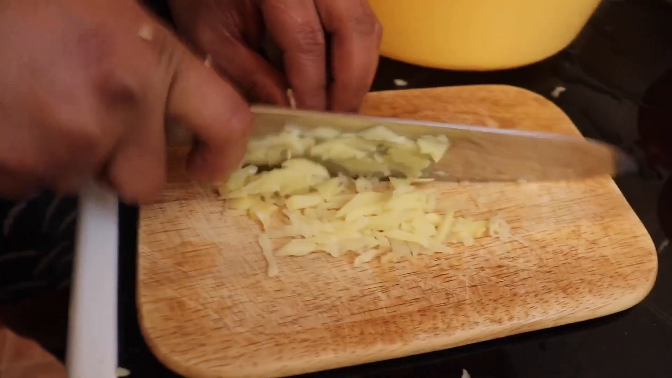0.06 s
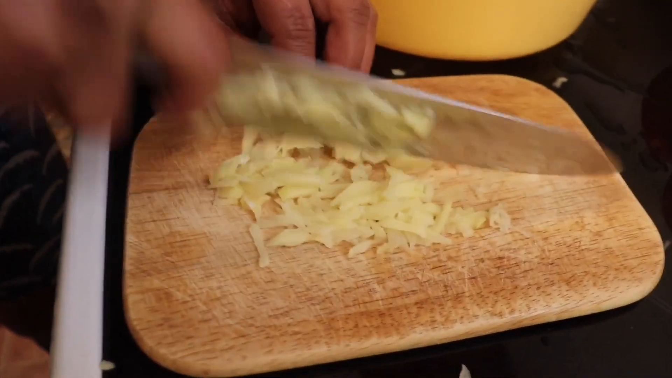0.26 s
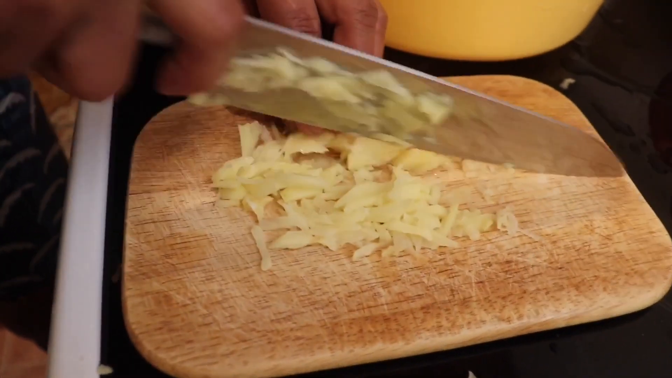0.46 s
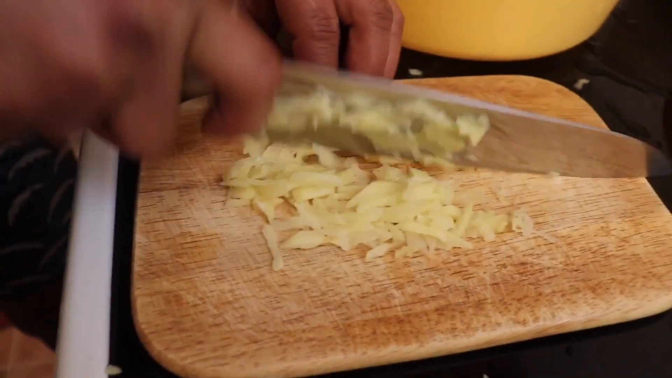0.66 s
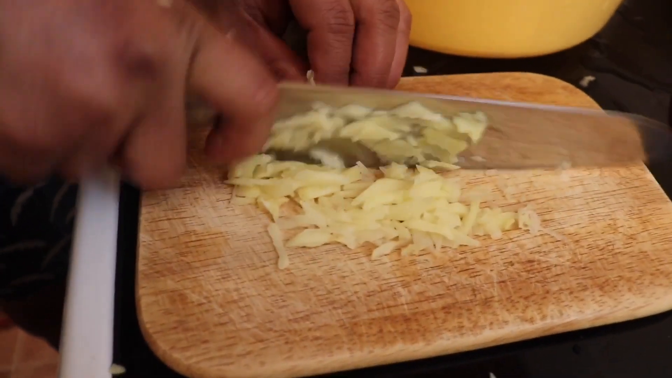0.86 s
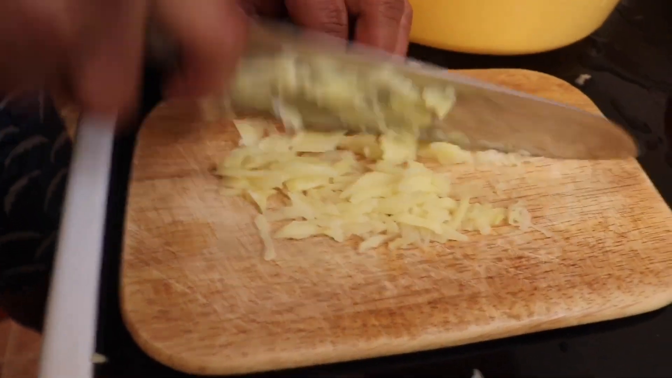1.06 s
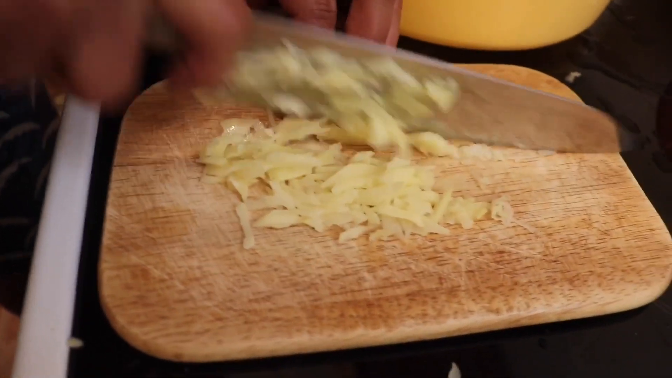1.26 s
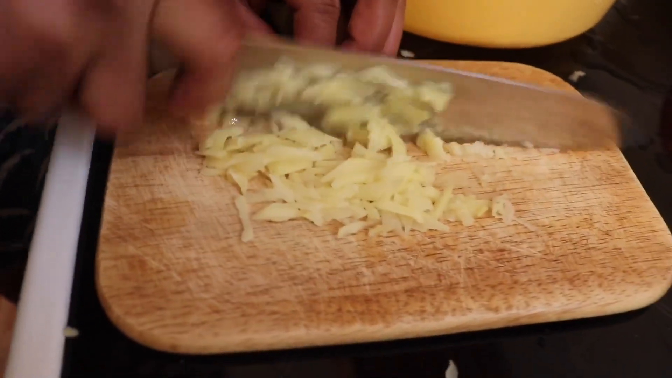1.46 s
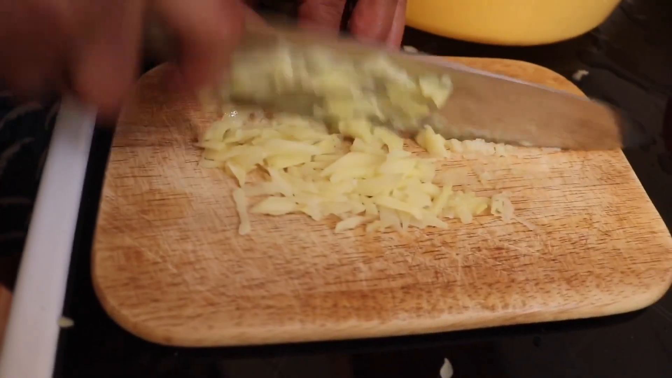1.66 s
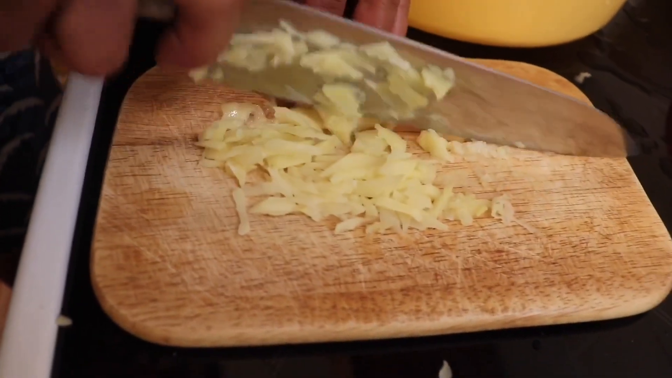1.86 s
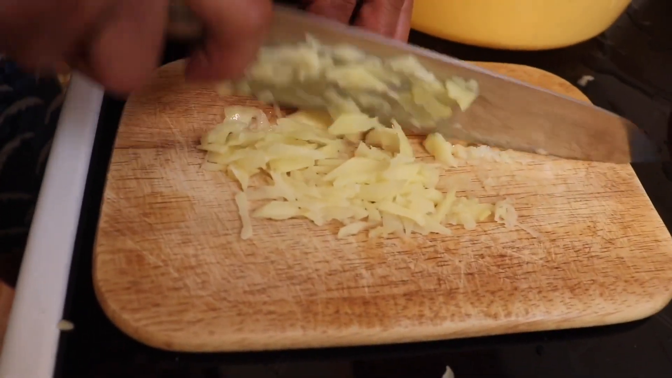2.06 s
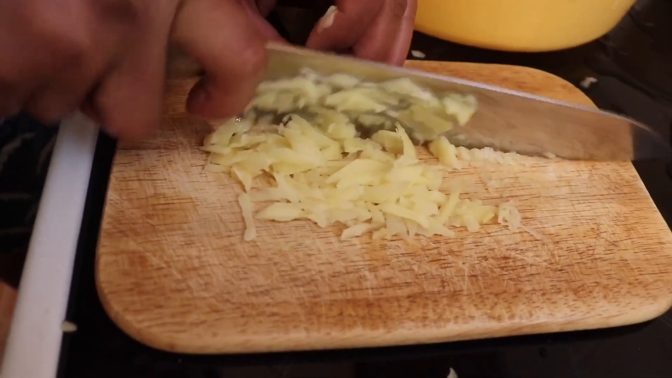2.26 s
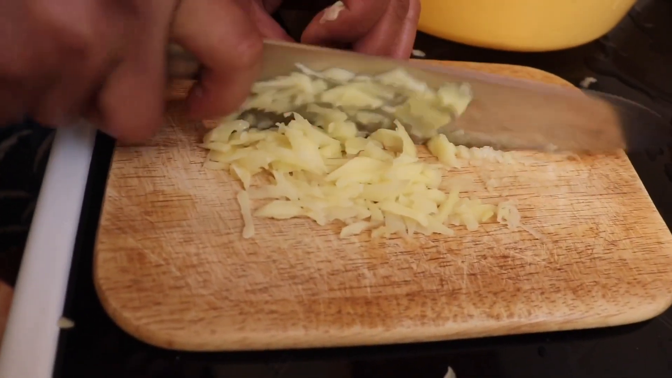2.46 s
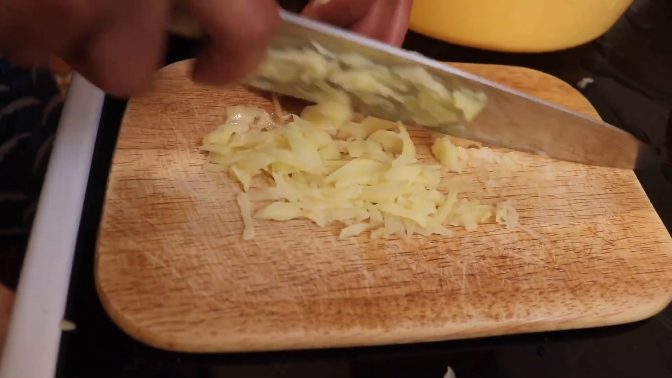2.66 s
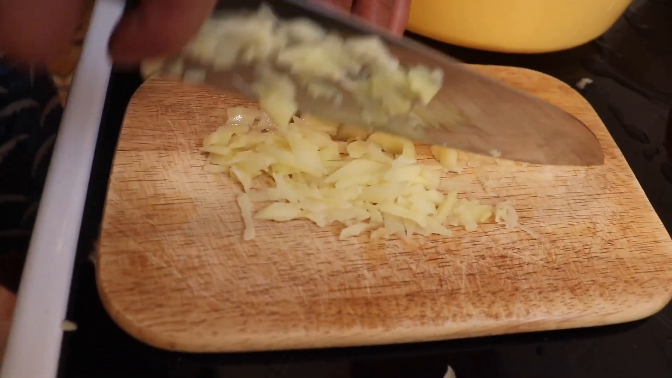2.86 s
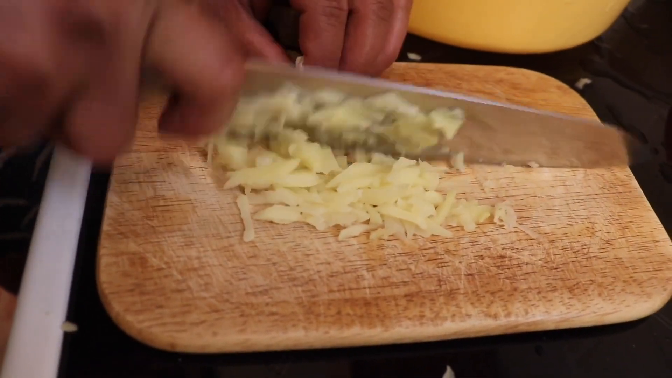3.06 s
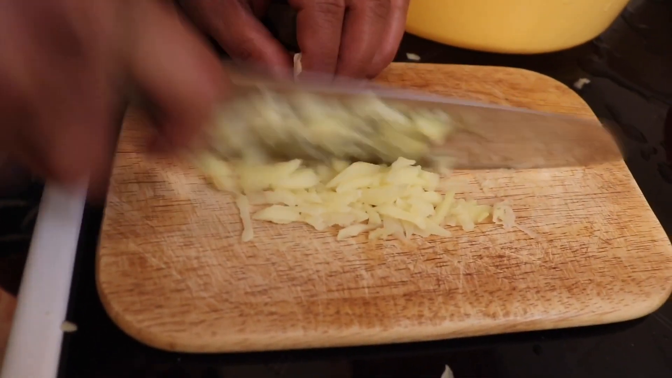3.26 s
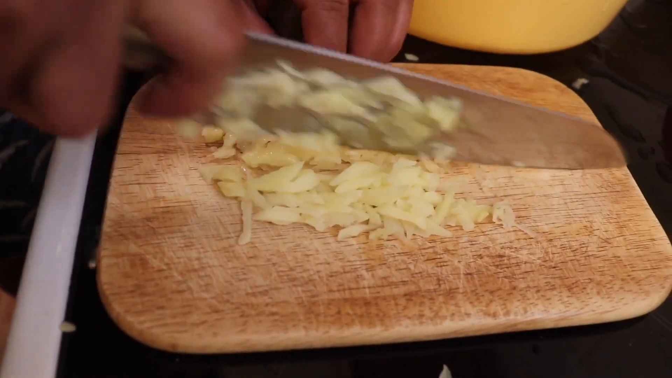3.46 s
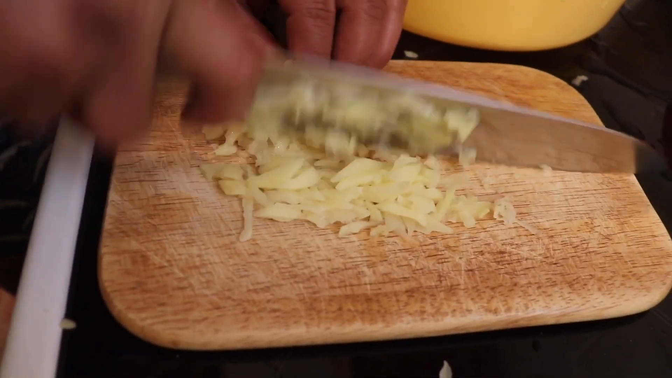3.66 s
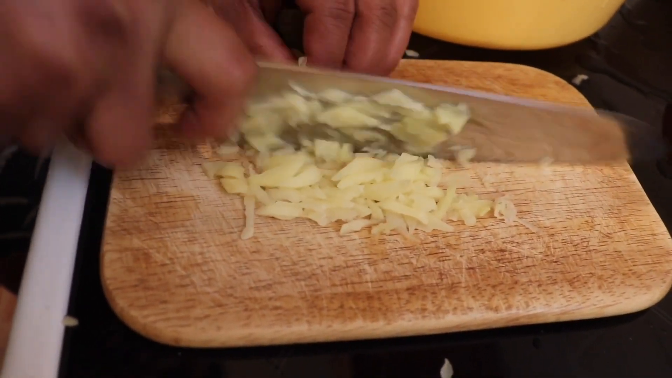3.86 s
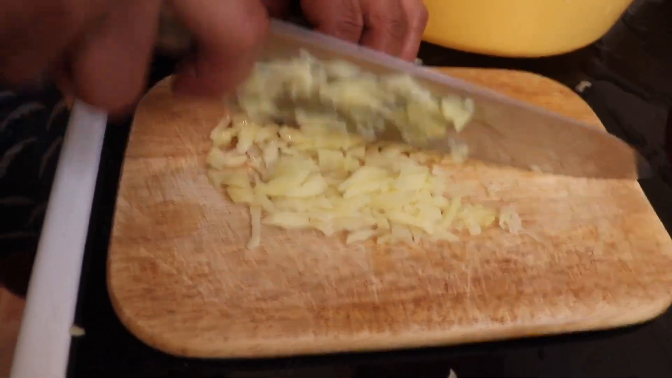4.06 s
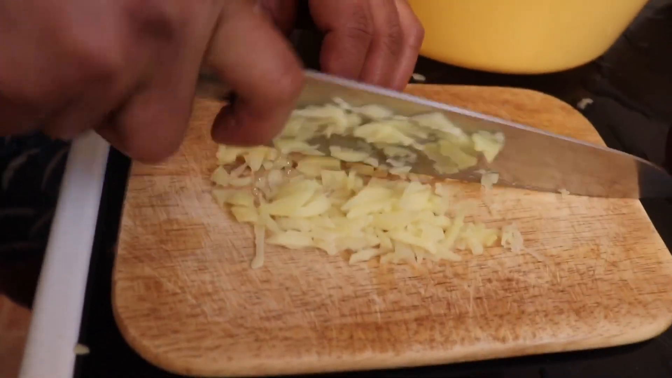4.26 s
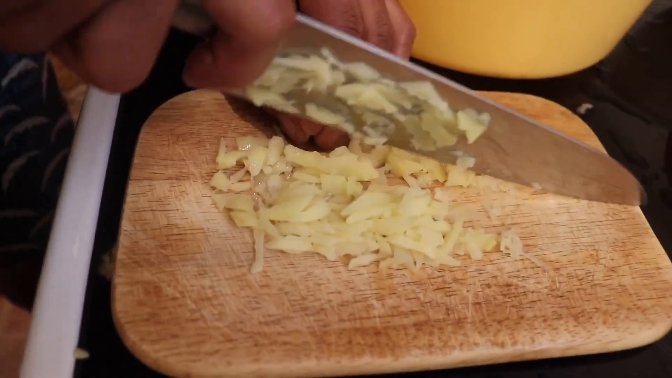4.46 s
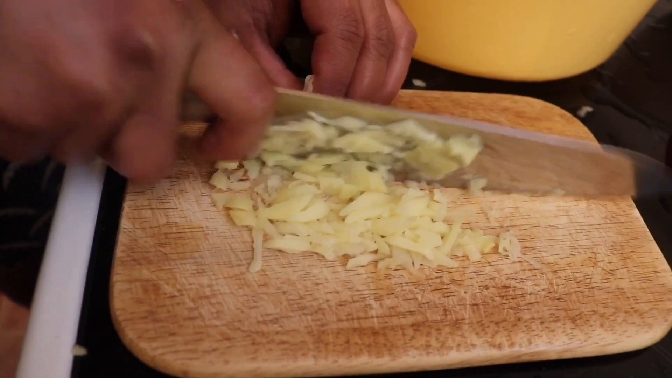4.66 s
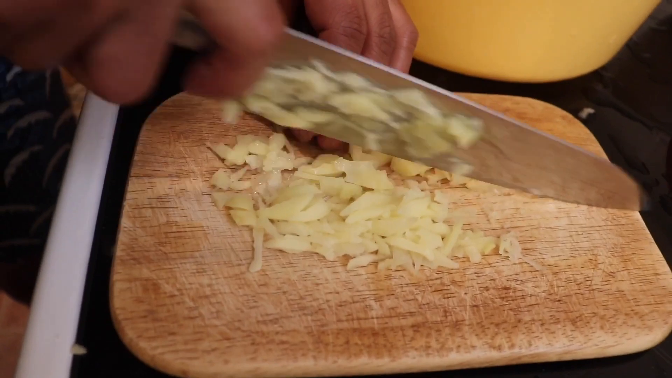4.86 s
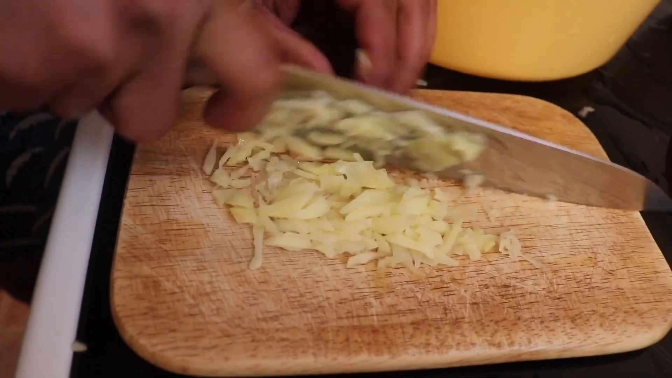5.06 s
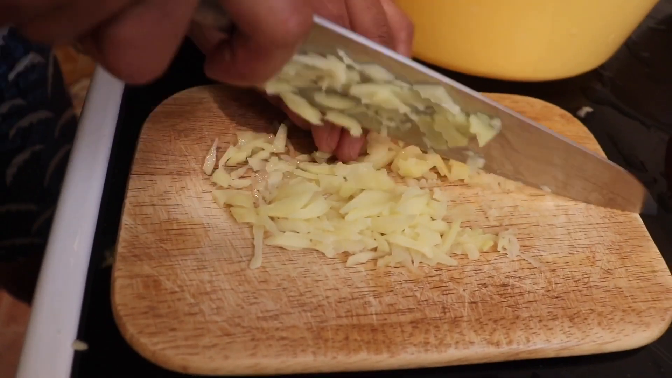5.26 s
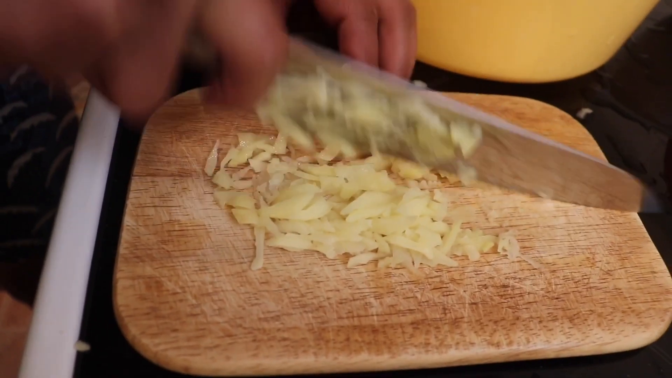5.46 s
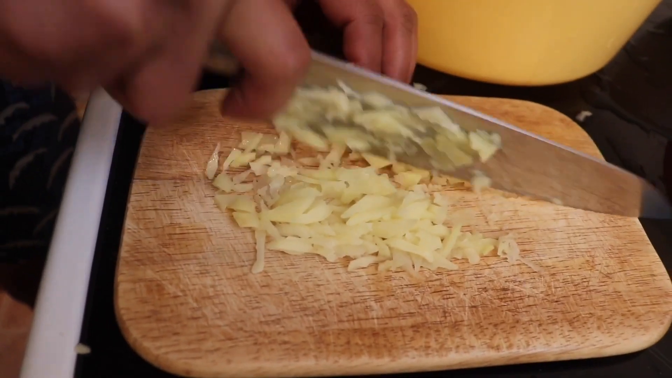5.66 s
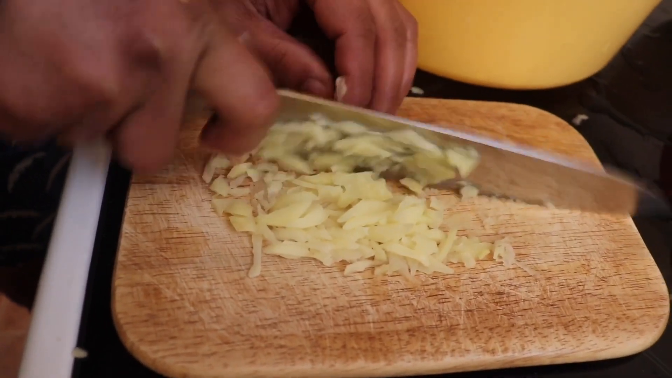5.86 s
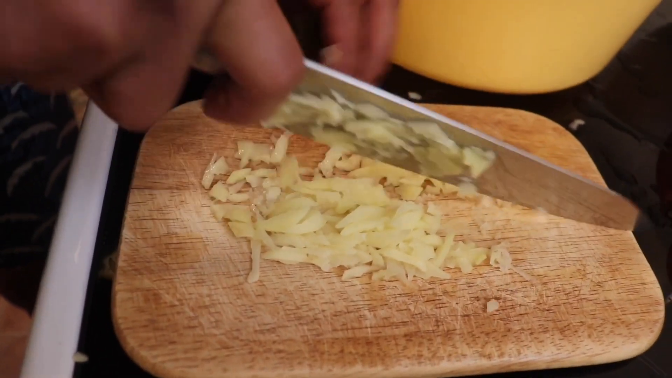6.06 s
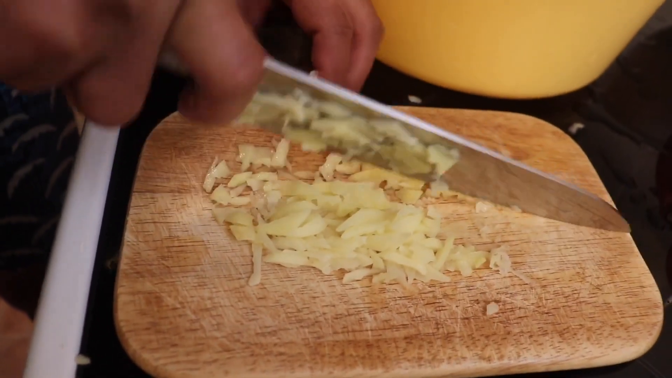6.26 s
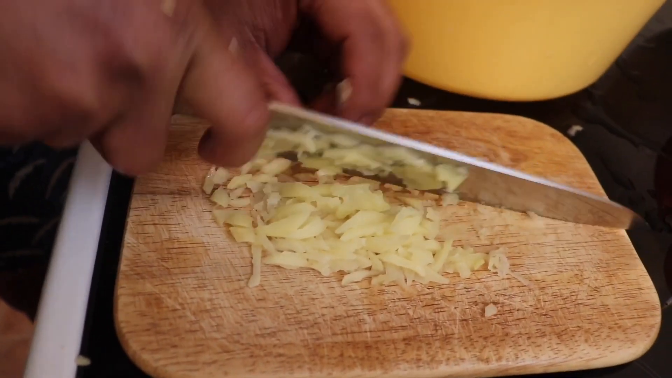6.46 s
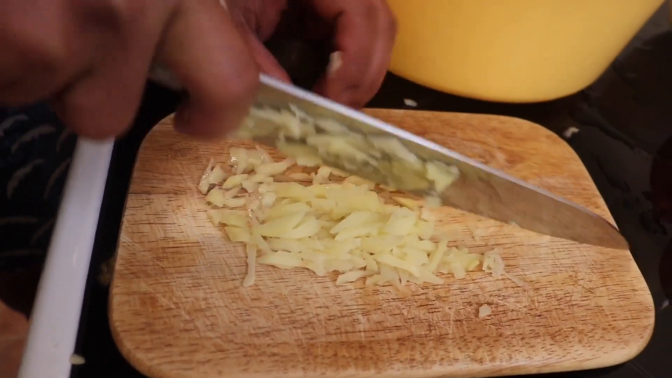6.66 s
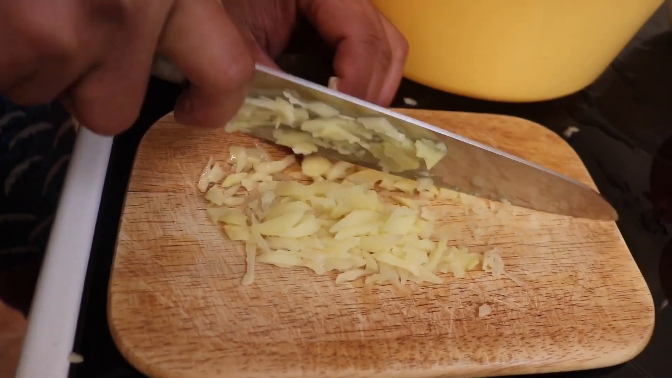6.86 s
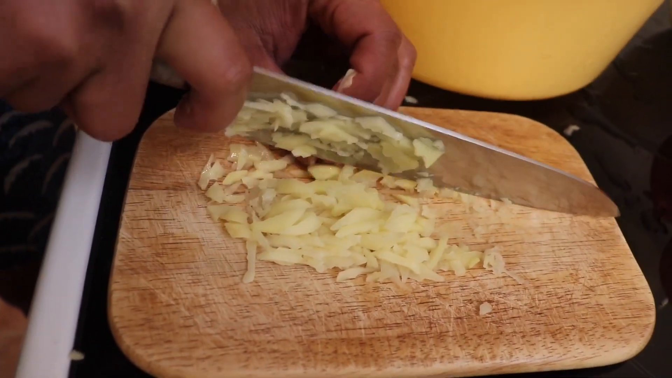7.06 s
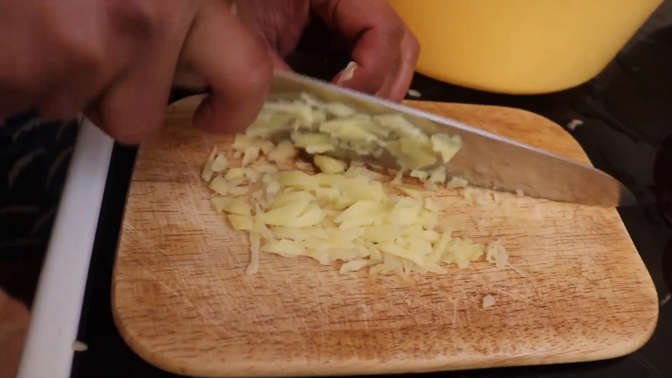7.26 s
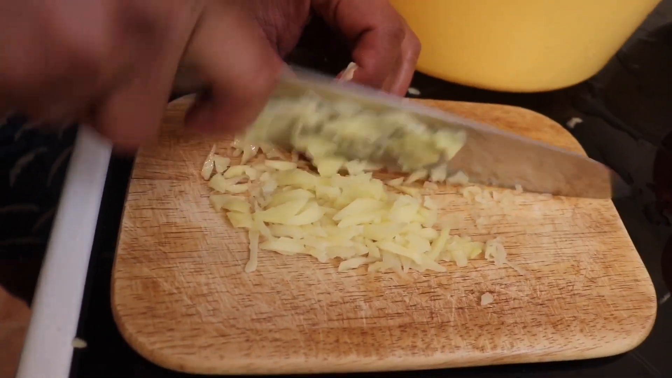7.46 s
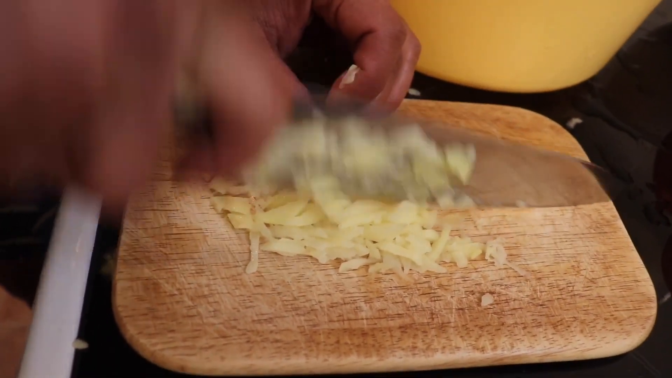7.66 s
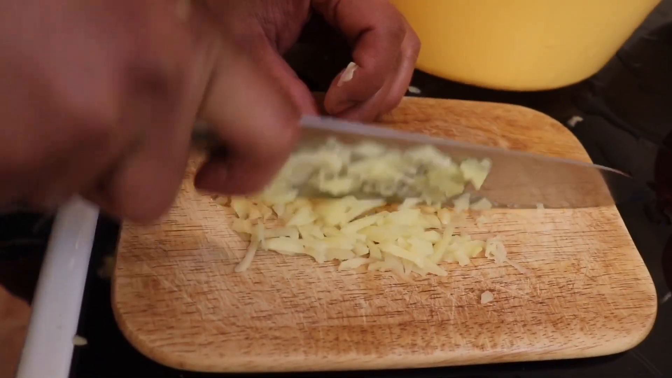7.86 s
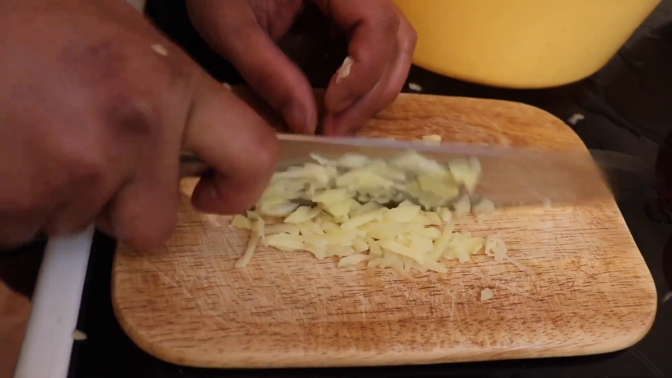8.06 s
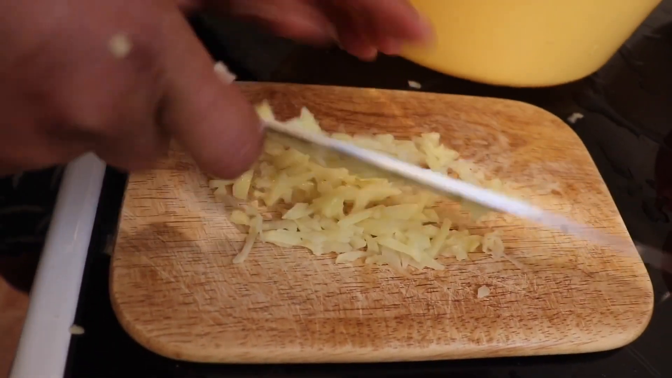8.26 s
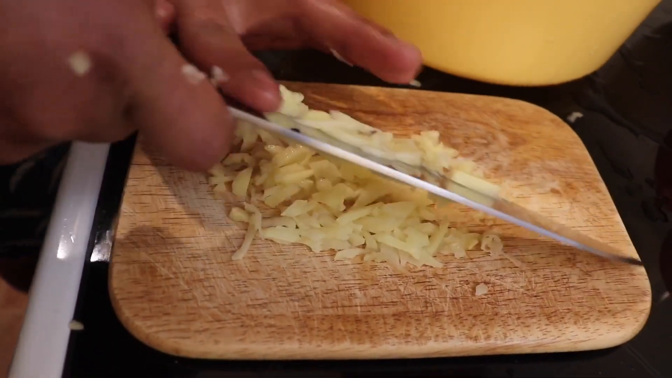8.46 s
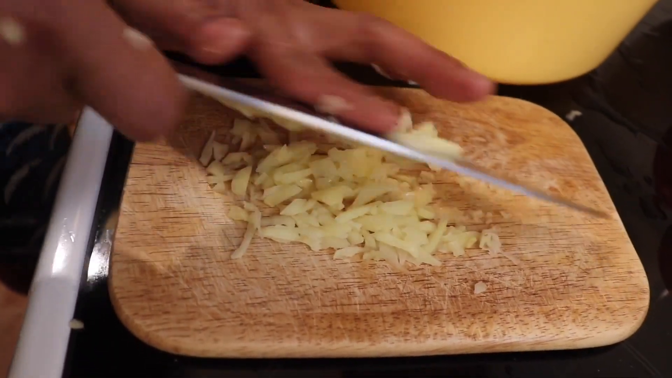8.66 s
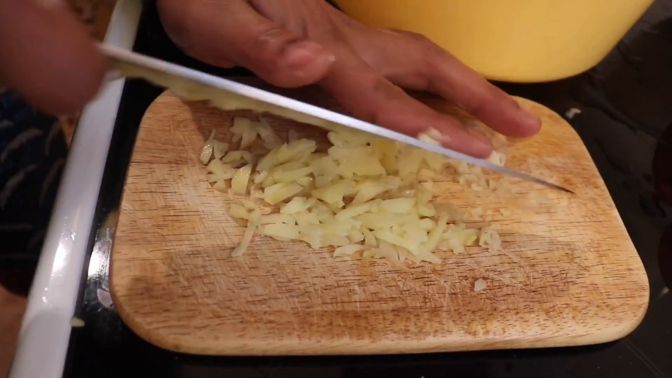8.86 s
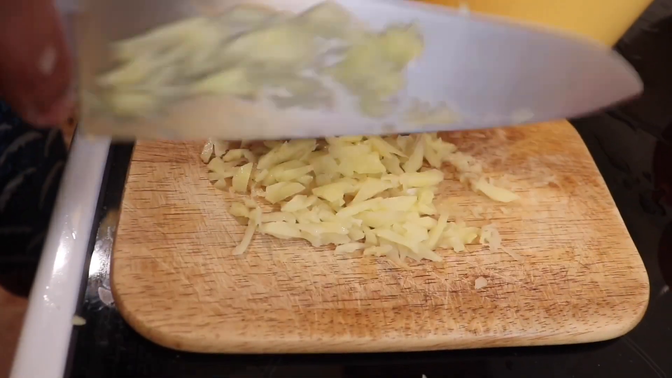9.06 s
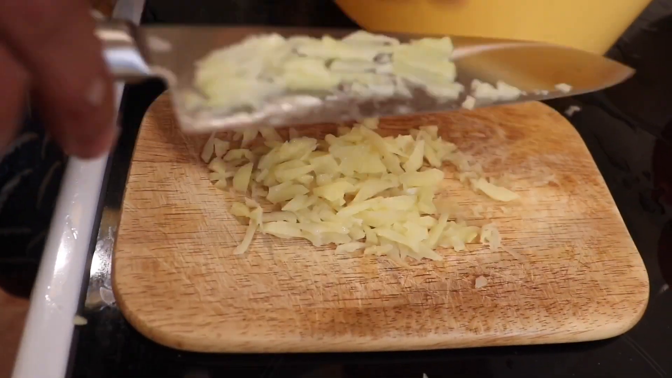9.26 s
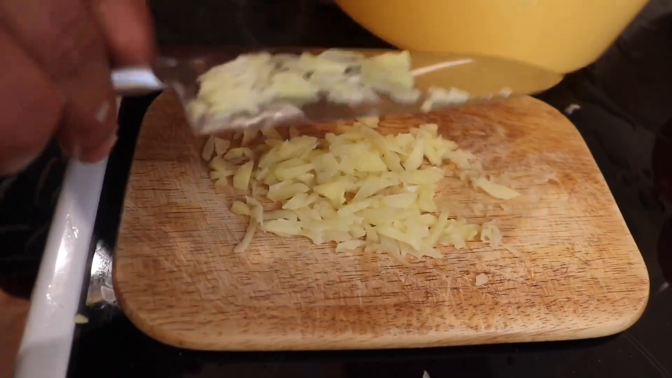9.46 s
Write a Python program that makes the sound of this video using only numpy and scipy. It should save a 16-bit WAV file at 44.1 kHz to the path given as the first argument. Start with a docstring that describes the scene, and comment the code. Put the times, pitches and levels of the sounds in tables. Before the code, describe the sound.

A knife chops wet raw potato on a wooden board in quick, fairly even crunching strokes, with a few hard knocks and faint hiss behind.

```python
"""A chef's knife shreds raw potato on a wooden board, close to the right side of a camera's two-port microphone.
Each stroke is a wet crunch of bursting cells, mostly followed by a second; the blade slides softly in between.
The board takes a few hard knocks, ringing as dying sines with a crack of noise and a short kitchen tail.
Dull bumps ring the camera shell, scraps of potato pat down, fingers wipe the blade and the table rumbles.
Behind it all lies a quiet, steady hiss of filtered noise."""
import sys
import numpy as np
from scipy import signal
from scipy.fft import rfft, irfft
from scipy.io import wavfile
from scipy.ndimage import uniform_filter1d

SR = 44100
rng = np.random.default_rng(int(sys.argv[2]) if len(sys.argv) > 2 else 0)


def log_audio(samples):
    """Write samples as a 16-bit WAV file to the path given in sys.argv[1]."""
    # one column per channel
    frames = np.atleast_2d(samples).T
    # limit to full scale, then quantise
    limited = np.clip(frames, -1, 1)
    pcm = np.round(limited * 32767).astype(np.int16)
    wavfile.write(sys.argv[1], SR, pcm)


N = 419388

# knife strokes, levels ahead of the knife's mix gains:
# (t/s, rise/s, hold/s, level/dB, bass/dB, treble/dB, slide back level/dB, second crunch)
STROKES = [(0.008, 0.012, 0.0055, -21, 0, 1.5, -51, None),
           (0.251, 0.01, 0.052, -33.5, -2.5, 0.5, -50.5, None),
           (0.543, 0.0061, 0.015, -19, -21, 0.5, -52, (0.06, .002, -43)),
           (0.805, 0.013, 0.012, -26.5, 3, -3.5, -50.5, (0.052, 0.0018, -22)),
           (0.989, .015, 0.011, -21, 22, -9, -64, None),
           (1.071, .013, 0.024, -17, -7, -2, -50.5, (.086, 0.011, -30.5)),
           (1.35, 0.0056, 0.053, -27, -2, -7, -48, None),
           (1.388, 0.012, 0.012, -23.5, -0.5, 0, -48.5, (0.049, 0.031, -25)),
           (1.649, .009, 0.029, -23, -7, -1.5, -50, (0.086, 0.0044, -26)),
           (1.925, 0.019, .013, -28.5, 1.5, -0.5, -53, (0.076, .002, -39)),
           (2.165, 0.0039, 0.024, -23, -0.5, .5, -48.5, (0.068, .002, -44)),
           (2.43, 0.0041, 0.009, -23.5, 16, 0, -49.5, None),
           (2.959, 0.0081, 0.015, -18, -7.5, 0, -47, (.072, 0.0022, -28)),
           (3.258, 0.012, 0.021, -24.5, 9.5, 1.5, -50.5, (0.077, .003, -38.5)),
           (3.552, 0.0042, 0.014, -23, 7, 2.5, -52.5, (0.061, 0.0082, -28)),
           (3.838, 0.0044, .013, -21, -11, 0.5, -55.5, (0.059, .002, -29)),
           (4.106, 0.0074, 0.022, -22, -4.5, 1, -61, (0.07, 0.0036, -29)),
           (4.629, .007, 0.019, -21, -2.5, -1.5, -55.5, (0.069, 0.0025, -28)),
           (4.94, 0.0074, 0.029, -24.5, 2, -1.5, -57, (0.078, 0.0027, -29)),
           (5.489, 0.0087, 0.017, -20.5, 1, -2.5, -57.5, (0.059, 0.013, -28)),
           (5.791, 0.0073, 0.014, -23.5, 7.5, -0.5, -61, (0.052, 0.0056, -24)),
           (5.963, 0.0043, 0.035, -38.5, 15, -4.5, -62, None),
           (6.341, 0.0033, 0.043, -30.5, -1, -2, -54, (0.069, .003, -24.5)),
           (6.534, 0.014, 0.027, -28, 5.5, -6, -72, None),
           (7.048, 0.0096, 0.1, -33.5, 9.5, -0.5, -49, None),
           (7.121, 0.015, 0.017, -19, -7, -2, -70, (0.065, 0.024, -30.5)),
           (7.346, 0.002, 0.026, -22.5, -3.5, 0, -56, (0.065, 0.011, -32.5)),
           (7.575, 0.012, 0.0064, -33, 3, -5, -58, None),
           (7.714, 0.016, 0.019, -21.5, -3, 1.5, -66, (0.066, .004, -29.5)),
           (8.004, 0.0022, 0.0068, -22, 11.5, -1, -52, (.073, 0.033, -38.5))]
# how the right-hand source reaches the two ports: (f/Hz, left minus right/dB)
BALANCE = [(60, 0), (170, -2), (300, -4), (540, -11), (750, -11), (1200, -16), (3000, -23), (6000, -27),
           (10000, -32), (15000, -32)]


def amp(db):
    """Decibels to gain."""
    return 10 ** (np.asarray(db) / 20)


def unit(x):
    """Scales to rms 1."""
    return x / np.sqrt(np.mean(x ** 2) + 1e-20)


def read(points, hz):
    """Reads a (f/Hz, value) table along log frequency."""
    f, value = np.transpose(points)
    return np.interp(np.log(hz + 1), np.log(f + 1), value)


def bins(size):
    """Frequencies of a real spectrum (Hz)."""
    return np.fft.rfftfreq(size, 1 / SR)


def add(mix, s, sound):
    """Mixes a sound in at time s (seconds)."""
    at = round(s * SR)
    sound = sound[..., max(-at, 0):]
    part = mix[..., max(at, 0):][..., :sound.shape[-1]]
    part += sound[..., :part.shape[-1]]


def causal(db):
    """Minimum-phase impulse response of a gain curve."""
    mirrored = np.r_[db, db[-2:0:-1]]
    log_gain = np.log(amp(mirrored))
    spectrum = np.exp(np.conj(signal.hilbert(log_gain)))
    return np.fft.ifft(spectrum).real[:len(db)]


def ring(modes, t):
    """Sum of dying sines; each mode falls 60 dB in its t60."""
    return sum(amp(db) * np.exp(-np.log(1000) * t / t60) * np.sin(2 * np.pi * hz * t)
               for hz, db, t60 in modes)


def coloured(x, colour):
    """Shapes a noise by a (f/Hz, level/dB) table, at rms 1."""
    spectrum = rfft(x) * amp(read(colour, bins(len(x))))
    return unit(irfft(spectrum, len(x)))


def pair(a, b, likeness):
    """Blends two unrelated spectra into one that is partly like the first."""
    c = np.clip(read(likeness, bins(N)), 0, 1)
    return c * a + np.sqrt(1 - c ** 2) * b


def ripple(hz, width_hz, count=24):
    """A random curve of rms 1 along frequency, with bumps about width_hz wide."""
    delay, phase = rng.random((2, count, 1))
    waves = np.cos(2 * np.pi * (delay * hz / (2 * width_hz) + phase))
    return unit(waves.sum(0))


def swells(rows):
    """Smooth bell-shaped rises and falls of pressure: (middle/s, half length/s, level/dB)."""
    t, pressure = np.arange(N) / SR, np.zeros(N)
    for s, half, db in rows:
        near = slice(max(int((s - 3 * half) * SR), 0), int((s + 3 * half) * SR))
        pressure[near] += amp(db) * np.exp(-((t[near] - s) / half) ** 2)
    return pressure


def hiss(left_db=-56, right_db=-56):
    """Steady room tone and microphone hiss; the ports share it mostly in the bass."""
    # colour of the background: (f/Hz, density level/dB)
    hiss_colour = [(20, -16), (50, -2.5), (110, -3), (200, 0.5), (520, 2.5), (850, -1), (2000, -4),
                   (4000, -7), (7000, -10.5), (11000, -16), (15500, -21)]
    # how alike the ports hear it: (f/Hz, likeness 0-1)
    hiss_likeness = [(60, 0.82), (180, 0.31), (550, 0.12), (15000, 0.034)]
    a, b = rfft(rng.standard_normal((2, N))) * amp(read(hiss_colour, bins(N)))
    left = unit(irfft(a, N))
    right = unit(irfft(pair(a, b, hiss_likeness), N))
    return np.array([amp(left_db) * left, amp(right_db) * right])


def crunches():
    """Each stroke gives a crunch and mostly a second, a quick flick with less bass and treble."""
    for s, rise, hold, db, bass_db, treble_db, _, second in STROKES:
        mid_db = -0.5 + 0.46 * bass_db  # the low mids follow the bass
        yield s, rise, hold, db, bass_db, mid_db, treble_db
        if second:
            delay, second_hold, second_db = second
            second_rise = 0.0038  # s
            yield (s + delay, second_rise, second_hold, second_db,
                   bass_db - 4.5, mid_db - 3, treble_db - 2.5)


def grains(size, per_s=9000, spread_db=2.0, clump_db=0.97, snaps_per_s=130, snap_size=1.2,
           snap_s=0.0043, order=150):
    """Cells burst as dense uneven clicks; now and then a whole layer tears at once and the crackle dies away."""
    clicks = rng.standard_normal(size) * (0.4 + (rng.random(size) < per_s / SR))
    sizes = amp(spread_db * np.minimum(rng.exponential(1, size), 4))
    clumps = amp(clump_db * unit(uniform_filter1d(rng.standard_normal(size), order)))
    snaps = (rng.random(size) < snaps_per_s / SR) * rng.uniform(0.28, 1, size) * snap_size ** 2
    snap_power = signal.lfilter([2], [1, -np.exp(-1 / (snap_s * SR))], snaps)
    tearing = np.sqrt(1 + snap_power)
    return unit(clicks * sizes * clumps * tearing)


def cuts(wander_db=2.0, wander_hz=170, steepness=1.29, fall_s=0.012, size=16384):
    """Each crunch swells, holds while the edge travels, and dies away, with its own random, gently uneven colour."""
    out, hz, lead = np.zeros(N), bins(size), 1 / 10
    t = np.arange(size) / SR - lead  # leaves room for the rise
    for s, rise, hold, db, bass_db, mid_db, treble_db in crunches():
        away = np.maximum(-t, 0) / max(rise, 1e-4) + np.maximum(t - hold, 0) / fall_s
        force = amp(db) * np.exp(-away ** steepness)
        crunch = force * grains(size)
        # the stroke sets the energy, however the flesh tears
        crunch *= np.linalg.norm(force) / np.linalg.norm(crunch)
        tilt = read([(280, bass_db), (550, mid_db), (1500, 0), (4000, 0), (9000, treble_db)], hz)
        unevenness = wander_db * ripple(hz, wander_hz) * np.minimum(hz / 1200, 1)
        add(out, s - lead, signal.fftconvolve(crunch, causal(tilt + unevenness)))
    return out


def slides(sticking_db=2.0, order=900):
    """The blade rubs wet potato around each cut and again as it is drawn back, sticking a little as it goes."""
    # sliding is duller than cutting: (f/Hz, level/dB)
    slide_tilt = [(150, 1), (550, 3.5), (1500, 5), (3200, 0.5), (4500, 0), (10000, -4), (15000, -7)]
    touch_delay_s, touch_half_s, touch_db = 0.021, 0.057, -21  # level relative to the cut
    slide_middle, slide_half = 0.56, 0.18  # drawing back, as shares of the pause
    last_pause_s = 0.23  # stands in for the pause after the last stroke
    starts, cut_db, back_db = np.transpose([(s, db, slide_db) for s, _, _, db, _, _, slide_db, _ in STROKES])
    pauses = np.diff(starts, append=starts[-1] + last_pause_s)
    drawing_back = swells(zip(starts + slide_middle * pauses, slide_half * pauses, back_db))
    touching = swells((s + touch_delay_s, touch_half_s, db + touch_db) for s, db in zip(starts, cut_db))
    sticking = amp(sticking_db * unit(uniform_filter1d(rng.standard_normal(N), order)))
    friction = (drawing_back + touching) * sticking * grains(N, snap_size=0.97)
    return irfft(rfft(friction) * amp(read(slide_tilt, bins(N))), N)


def knife(cut_db=-0.42, slide_db=2.5, port_phase=1.84, size=4096):
    """Crunching and sliding ring board and blade; the left port is shaded and lags."""
    # smooth colour of a crunch: (f/Hz, level/dB)
    crunch_colour = [(30, -39.5), (120, -29.5), (180, -20), (350, -17.5), (450, -7.5), (900, -9),
                     (2000, -8), (4000, -6.5), (8000, -6), (10700, -11), (12000, -12), (15500, -16.5)]
    # resonances of board and blade under a crunch: (f/Hz, width/Hz, height/dB)
    body_peaks = [(170, 8.7, 11.5), (295.6, 15, 11.5), (545, 110, 13.5), (714, 96, 7), (1010, 28, 9),
                  (2430, 164, 5), (2775, 92, 3.5), (3086, 460, 10), (4130, 47, -9), (5760, 1800, -1.5),
                  (13070, 860, 3)]
    # how alike the ports hear the crunch: (f/Hz, likeness 0-1)
    crunch_likeness = [(100, 0.54), (550, 0.58), (3000, 0.41), (10000, .6)]
    hz = bins(size)
    peaks = sum(db / (1 + (2 * (hz - f) / width) ** 2) for f, width, db in body_peaks)
    body = causal(read(crunch_colour, hz) + peaks)
    body /= np.linalg.norm(body)

    def source_spectrum():
        """Independent grains for the same strokes, through board and blade."""
        source = amp(cut_db) * cuts() + amp(slide_db) * slides()
        return rfft(signal.oaconvolve(source, body)[:N])

    right, other = source_spectrum(), source_spectrum()
    lag = np.exp(-1j * port_phase * np.minimum(bins(N) / 520, 1))  # port_phase in radians
    left = pair(right, other, crunch_likeness) * amp(read(BALANCE, bins(N))) * lag
    return irfft([left, right], N)


def rumble():
    """The table shakes briefly after each stroke, more under firm, bassy ones, at both ports alike."""
    # colour of the rumble: (f/Hz, level/dB)
    rumble_colour = [(20, -14), (60, -12), (125, -6.5), (200, -11), (400, -5), (2000, -60)]
    delay_s, half_s, shake_db, bass_limit_db = 0.1, 0.032, -33.5, 2  # level relative to the stroke
    shakes = swells((s + delay_s, half_s, db + min(bass_db, bass_limit_db) + shake_db)
                    for s, _, _, db, bass_db, *_ in STROKES)
    return shakes * coloured(rng.standard_normal(N), rumble_colour)


def scraps(decay_s=0.0042, left_db=-3, size=2048):
    """Each scrap of potato lands on the board with a small damp pat, a dying burst of band-passed noise."""
    # falling scraps: (t/s, level before the left port's cut/dB, f/Hz)
    scrap_drops = [(0.129, -36, 1390), (0.259, -26, 970), (0.433, -33.5, 1300), (5.185, -35, 1160),
                   (6.114, -36, 730)]
    out, t = np.zeros((2, N)), np.arange(size) / SR
    for s, db, hz in scrap_drops:
        band = signal.butter(2, [hz / 1.96, hz * 1.29], "band", fs=SR)
        burst = rng.standard_normal((2, size)) * np.exp(-t / decay_s)
        pat = signal.lfilter(*band, burst)
        add(out, s, amp(db) * amp([[left_db], [0]]) * pat / abs(pat).max())
    return out


def kitchen(x, first_s=0.0044, size=22050):
    """A short diffuse tail of noise dying at its own pace in each band, different at each port."""
    # decay of the kitchen: (f/Hz, t60/s)
    room_t60 = [(150, 0.38), (700, 0.22), (2500, 0.28), (8000, 0.12)]
    # colour of the kitchen: (f/Hz, level/dB)
    room_colour = [(100, 7), (250, 10), (550, -3.5), (1300, 13.5), (2550, -4), (3500, -1), (8000, -17)]
    hz, t, z = signal.stft(rng.standard_normal((2, size)), SR, nperseg=256)
    decay = np.exp(-np.log(1000) * t / read(room_t60, hz)[:, None])
    z = z * amp(read(room_colour, hz))[:, None] * decay
    tail = signal.istft(z, SR, nperseg=256)[1]
    tail *= np.arange(tail.shape[1]) / SR > first_s
    return signal.oaconvolve(x[None], tail / np.linalg.norm(tail[0]), axes=1)[:, :N]


def knocks(ring_rise=0.00036, crack_db=-13, low_hz=185, left_db=-2, wet_db=-17, wet_left_db=-21, size=16384):
    """The edge cracks into the board, which gives a short hollow note; the blade rings a moment later."""
    # hard knocks on the board: (t/s, level/dB, crack and blade ring level/dB, room send level/dB)
    knock_events = [(0.991, -11.5, 0, 7), (6.7941, 0, 4, 1), (9.292, -22.5, 1, 4)]
    # modes of the struck board: (f/Hz, level/dB, t60/s)
    board_modes = [(240, -33.5, 0.045), (327, -20.5, 0.05), (549, 4, 0.014), (676, -6.5, 0.04),
                   (700, -40.5, 0.66), (927, -15, 0.045)]
    # the bright blade ring just after a knock: (f/Hz, level/dB, t60/s)
    blade_modes = [(1900, -42, 0.042), (2450, -40, 0.014), (2530, -4.5, 0.017), (2790, -10.5, 0.011),
                   (3430, -12, 0.0097)]
    # the broad crack of the edge biting the wood: (f/Hz, level/dB)
    crack_colour = [(300, -25), (1200, -9), (2500, 6), (4000, -0.5), (5000, -12), (8000, -17.5),
                    (15000, -45)]
    ring_delay_s, crack_s = 0.0024, 0.0017  # blade after wood; time scale of the crack
    dry, send, t = np.zeros(N), np.zeros(N), np.arange(size) / SR
    late = np.maximum(t - ring_delay_s, 0)
    wood = ring(board_modes, t) * (1 - np.exp(-t / 0.001))
    steel = ring(blade_modes, late) * (1 - np.exp(-late / ring_rise))
    no_bass = signal.butter(4, low_hz, "high", fs=SR)  # a small board radiates no deep bass
    for s, db, treble_db, room_db in knock_events:
        crack_shape = (t / crack_s) ** 2 * np.exp(-t / crack_s)
        crack = amp(crack_db) * coloured(rng.standard_normal(size), crack_colour) * crack_shape
        blow = amp(db) * signal.lfilter(*no_bass, wood + amp(treble_db) * (steel + crack))
        add(dry, s, blow)
        add(send, s, amp(room_db) * blow)
    left = signal.oaconvolve(dry, causal(read(BALANCE, bins(size)) + left_db))[:N]
    return np.array([left, dry]) + amp([[wet_left_db], [wet_db]]) * kitchen(send)


def bumps(level_db=-7.0, right_cut_hz=1100, shared_hz=110, flex_hz=330, scuff_db=1, scuff_s=0.0026, size=4096):
    """A push and a brief scuff, rounded by their cut-off, set the shell ringing; the right port hears it duller."""
    # dull bumps near the microphone, ahead of the common level and the shared bass:
    # (t/s, level/dB, cut-off f/Hz, left minus right/dB ahead of the right port's dulling)
    bump_events = [(1.072, -12.5, 900, 11), (1.102, -21.5, 170, 19), (1.133, -25, 200, 11),
                   (2.3634, -2, 2140, 9), (2.378, -6.5, 1090, 14), (2.4132, -6, 850, 13),
                   (2.4321, -5, 1000, 17), (2.449, -8, 700, 1), (2.4537, -6, 2310, 25),
                   (3.585, -26.5, 250, -11), (7.965, -20.5, 220, 17), (8.022, -20.5, 298, -15),
                   (8.104, -32, 200, 13), (9.344, -35.5, 150, 5)]
    # colour of a bump: (f/Hz, level/dB)
    bump_colour = [(25, -17), (60, -9), (110, 5), (200, 1.5), (300, 3), (380, -2.5), (540, 4.5),
                   (800, -3.5), (1050, -3.5), (3000, -18.5), (15000, 1)]
    # ringing of the camera shell: (f/Hz, level/dB, t60/s)
    shell_modes = [(293, -34, 0.22), (586, -8, 0.015), (818, -17.5, 0.08), (1233, -22, 0.045)]
    out, t = np.zeros((2, N)), np.arange(size // 2 + 1) / SR
    push = causal(read(bump_colour, bins(size)))
    # the shell yields and springs back: an all-pass that leaves the colour alone
    give = np.exp(-2 * np.pi * flex_hz / SR)
    push = signal.lfilter([give, -1], [1, -give], push)
    scuff_band = signal.butter(2, [3000, 5200], "band", fs=SR)
    for s, db, cut_hz, pan_db in bump_events:
        rounded = signal.butter(2, min(cut_hz, SR / 3), fs=SR)
        soft = signal.lfilter(*rounded, push)
        scuff = signal.lfilter(*scuff_band, rng.standard_normal(len(t)))
        scuff = amp(scuff_db) * unit(scuff) * np.exp(-t / scuff_s)
        left = soft / abs(soft).max() + signal.lfilter(*rounded, ring(shell_modes, t) + scuff)
        right = signal.lfilter(*signal.butter(1, right_cut_hz, fs=SR), left)
        sides = amp([[pan_db / 2], [-pan_db / 2]])
        add(out, s, amp(db + level_db) * sides / sides.mean() * np.array([left, right]))
    both = out.mean(0)  # the deep bass reaches both ports alike
    return both + signal.filtfilt(*signal.butter(1, shared_hz, "high", fs=SR), out - both)


def wipes(left_db=-5):
    """Wet fingers rub along the steel: swells of coloured grains, unrelated at the two ports."""
    # finger wipes: (middle t/s, half length/s, level at the right port/dB)
    wipe_events = [(6.085, 0.052, -47.5), (8.45, 0.035, -56), (8.935, 0.028, -50.5), (9.035, 0.03, -54),
                   (9.45, 0.083, -50.5)]
    # colour of a wipe: (f/Hz, level/dB)
    wipe_colour = [(150, -27), (450, -8), (730, 7.5), (880, -15), (1400, -6), (1850, -2), (2600, -4),
                   (3300, -13), (6000, -16), (15000, -28)]
    rubbing = np.array([coloured(grains(N), wipe_colour) for _ in range(2)])
    return amp([[left_db], [0]]) * swells(wipe_events) * rubbing


def scene():
    """Knife, knocks, bumps and small handling sounds over the room tone."""
    return hiss() + knife() + rumble() + scraps() + knocks() + bumps() + wipes()


def record(dry):
    """The microphone input rounds off hard peaks; then the band limit."""
    rounded = dry / (1 + (dry / 0.9) ** 4) ** 0.25
    edge_hz = 15900
    low_pass = signal.firwin(511, edge_hz, window=("kaiser", 9), fs=SR)
    return signal.oaconvolve(rounded, low_pass[None], "same", axes=1)


dry = scene()
out = record(dry)
log_audio(out)
```